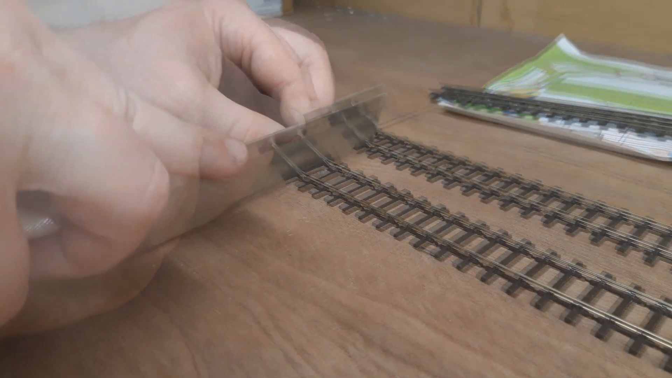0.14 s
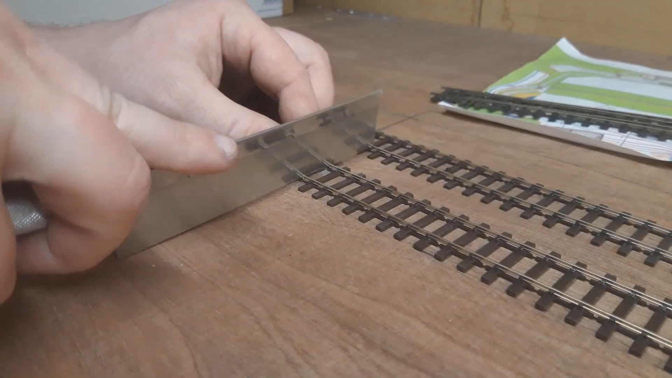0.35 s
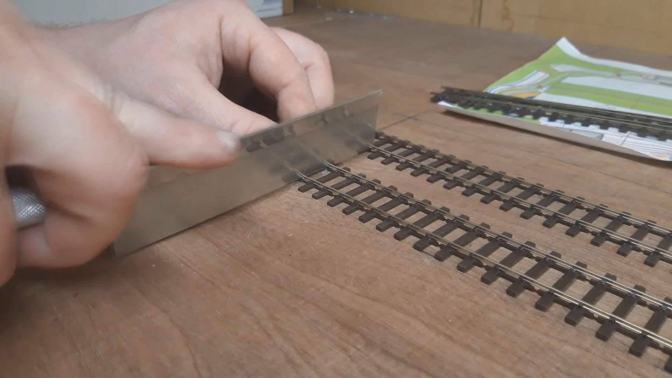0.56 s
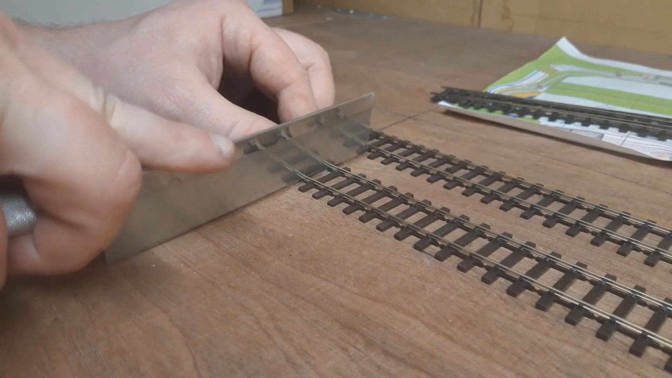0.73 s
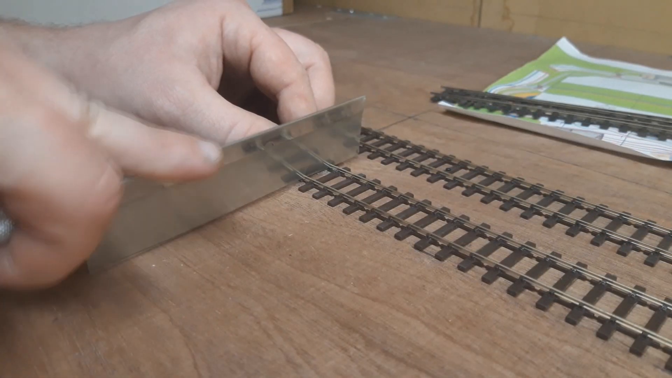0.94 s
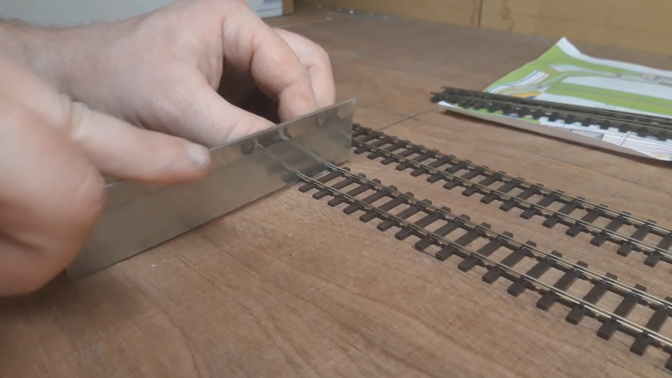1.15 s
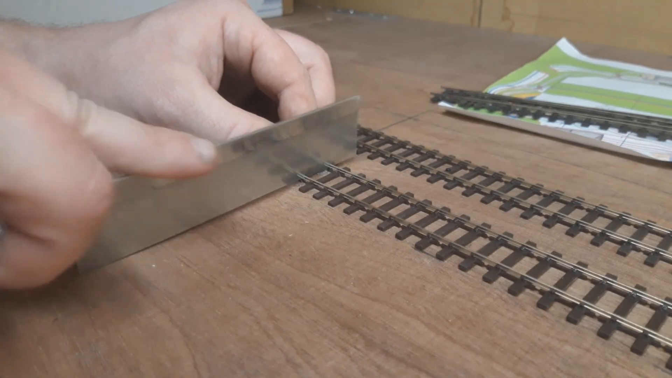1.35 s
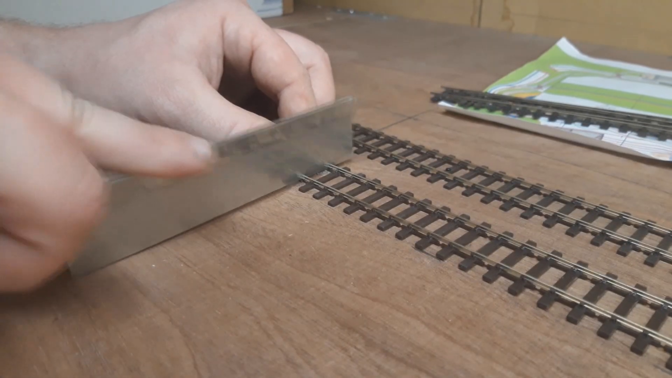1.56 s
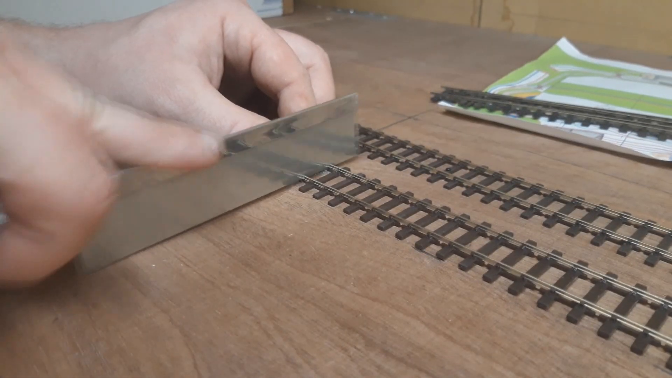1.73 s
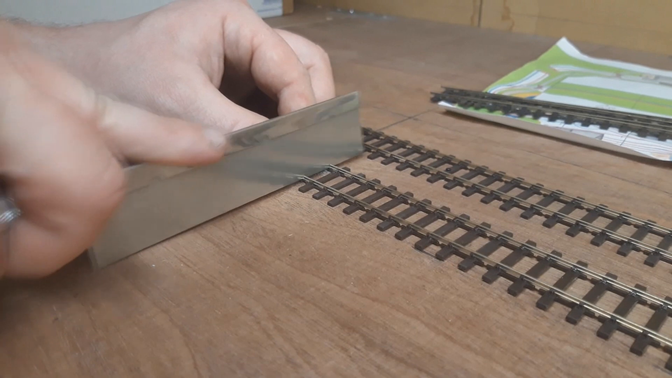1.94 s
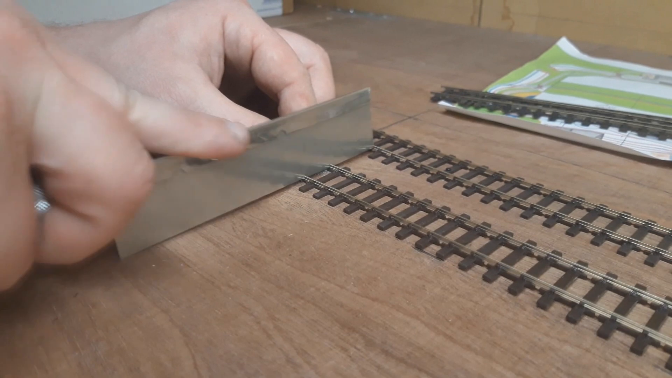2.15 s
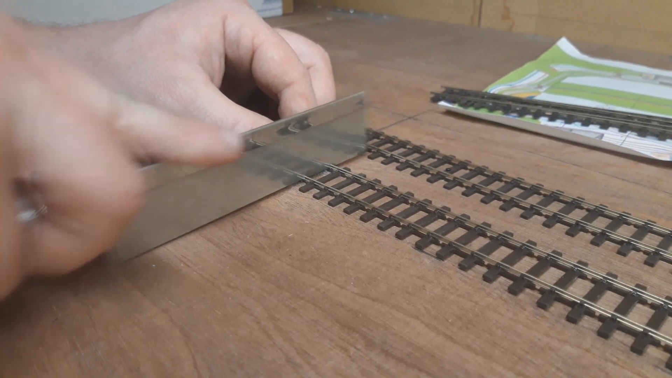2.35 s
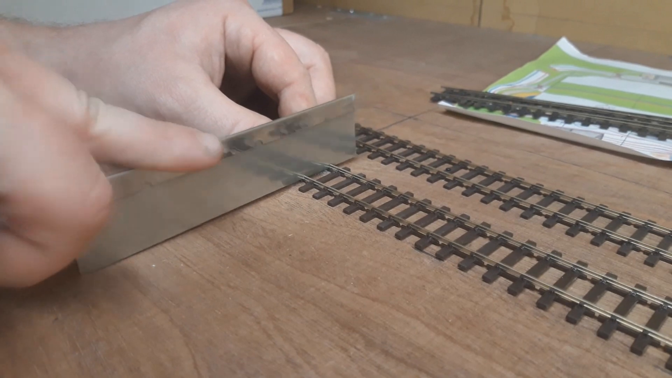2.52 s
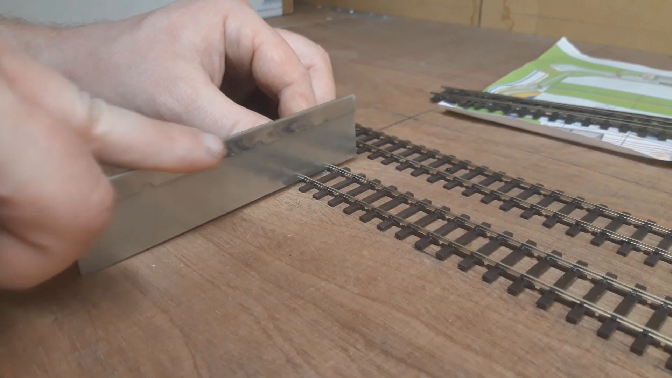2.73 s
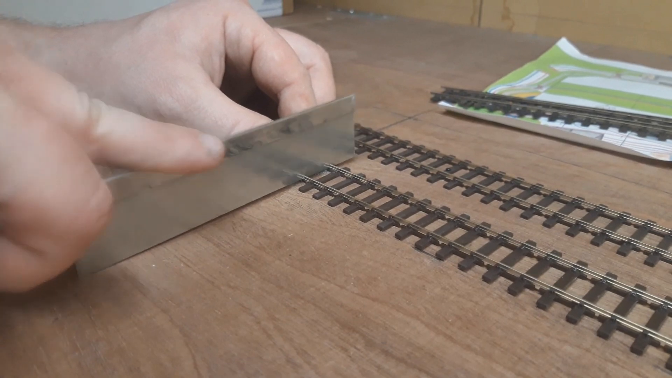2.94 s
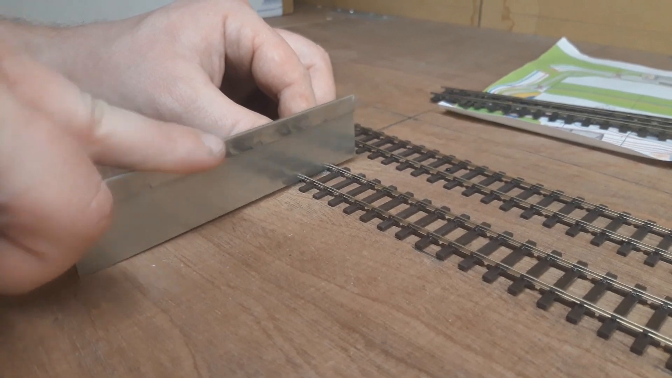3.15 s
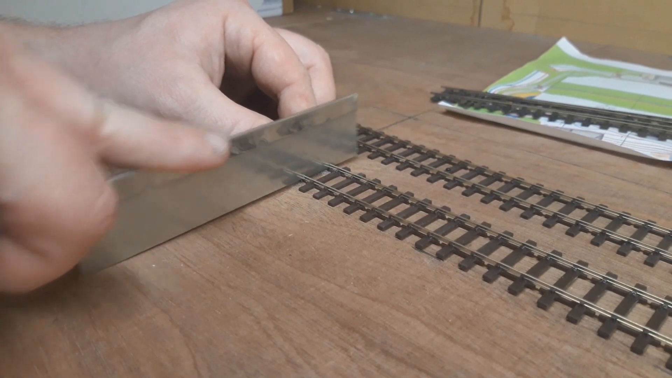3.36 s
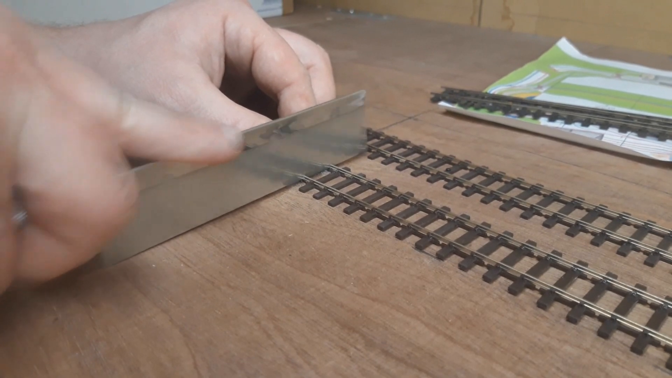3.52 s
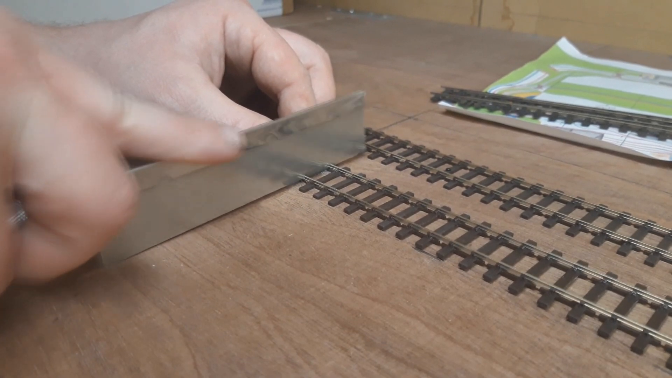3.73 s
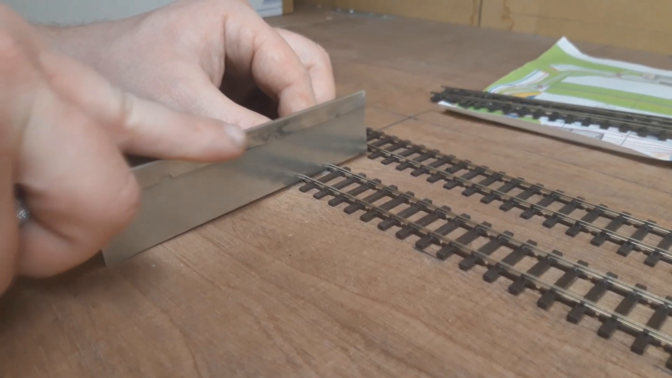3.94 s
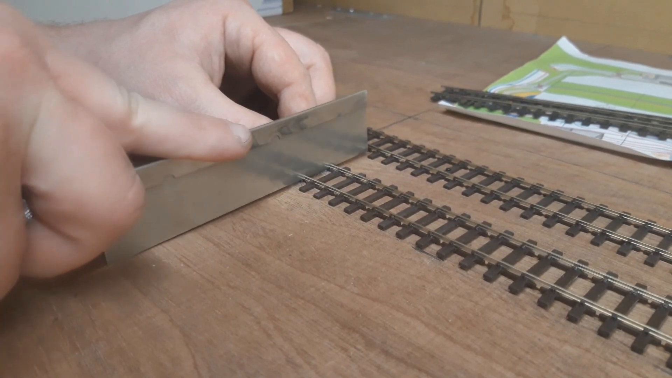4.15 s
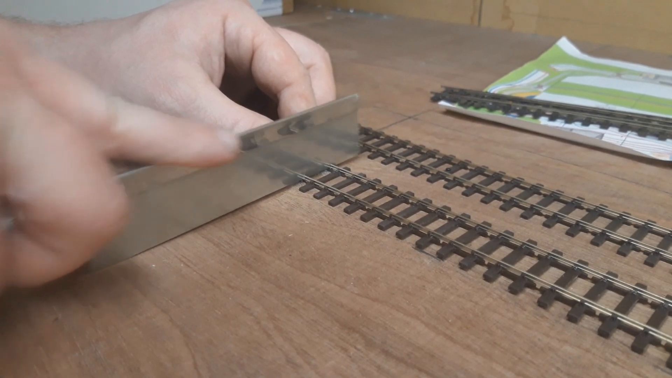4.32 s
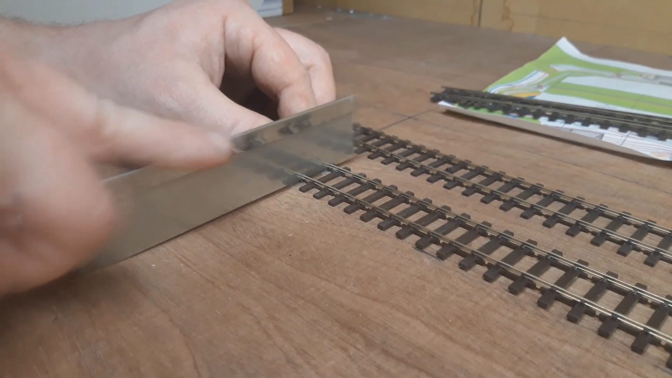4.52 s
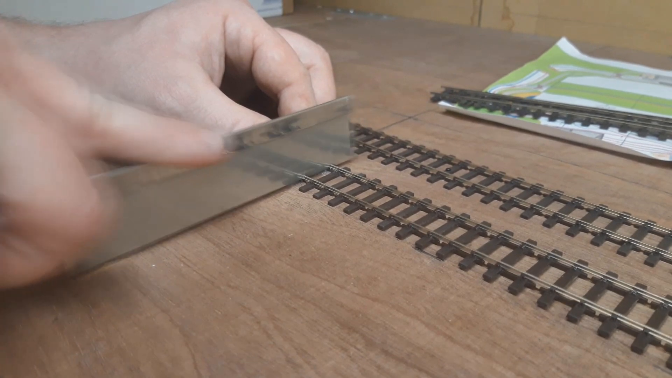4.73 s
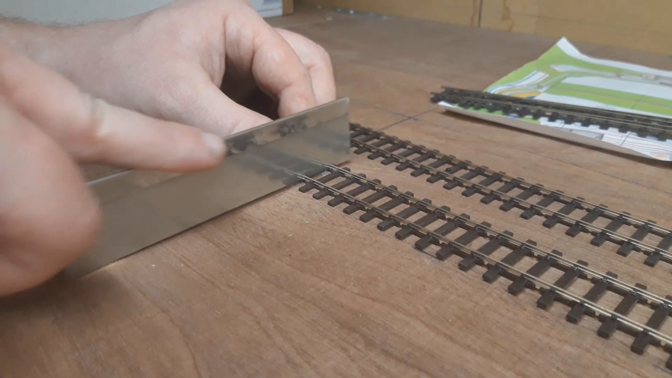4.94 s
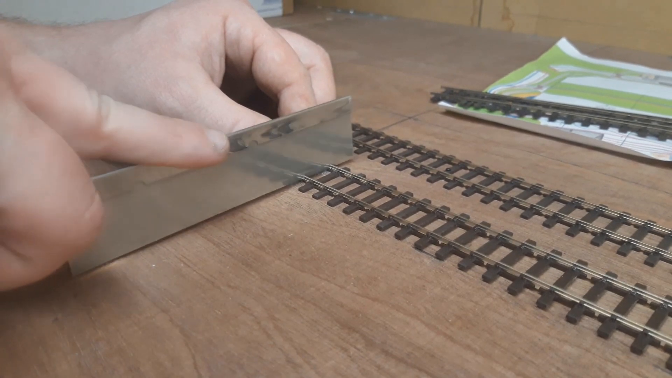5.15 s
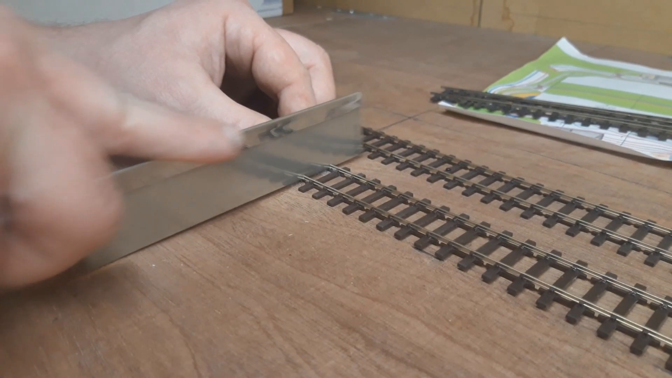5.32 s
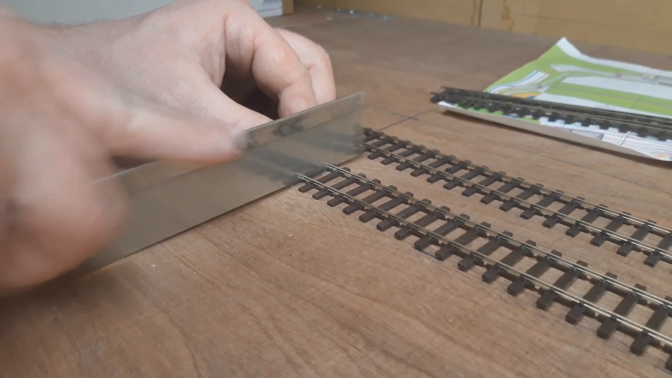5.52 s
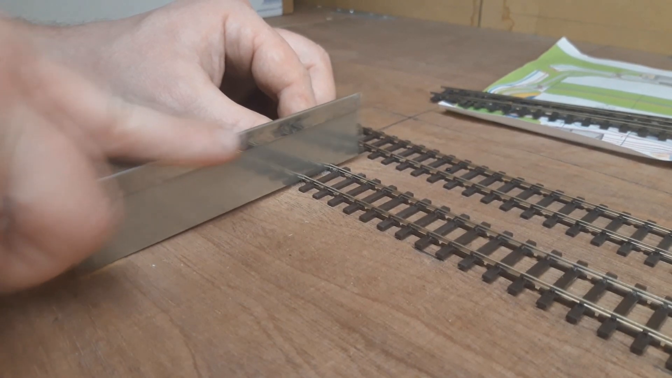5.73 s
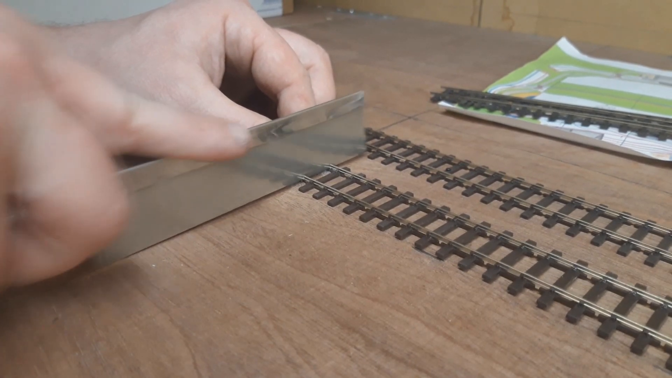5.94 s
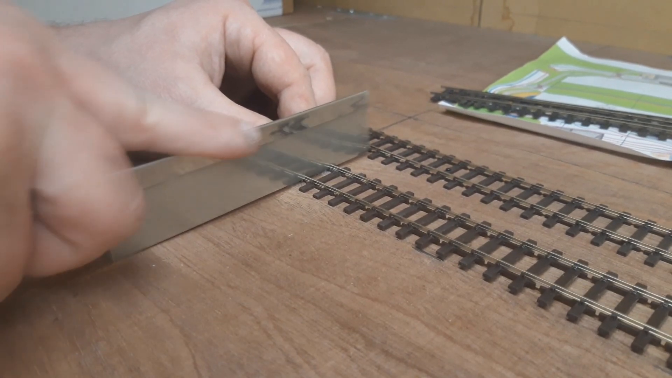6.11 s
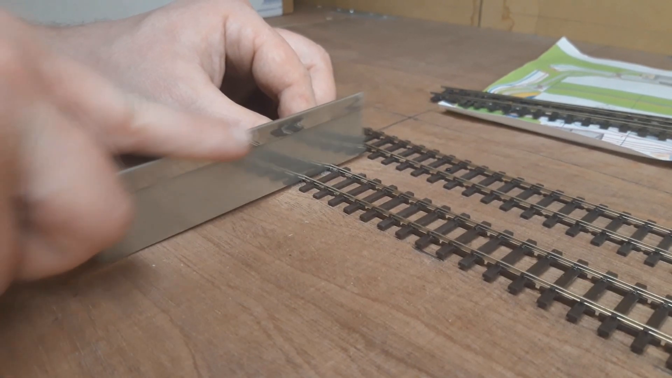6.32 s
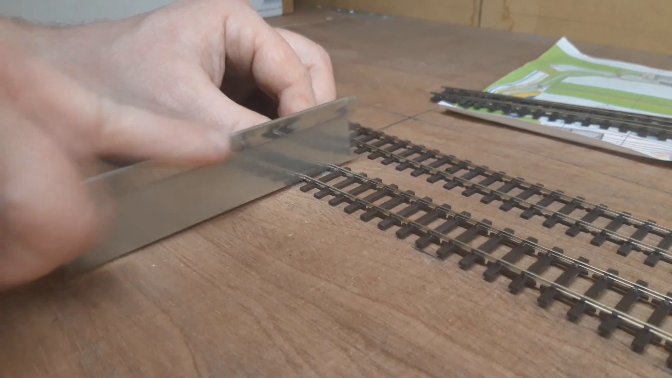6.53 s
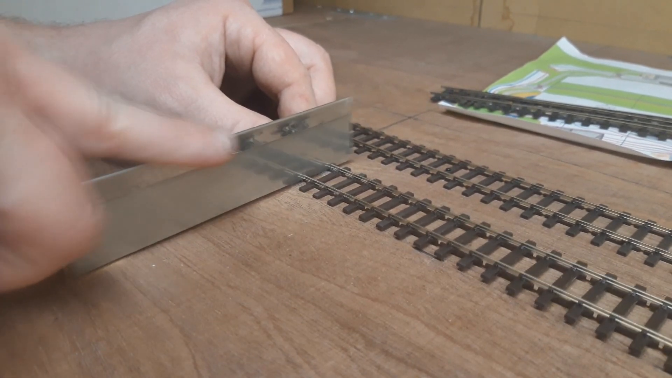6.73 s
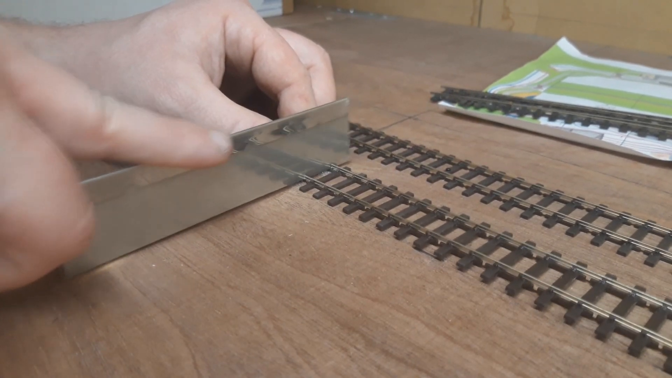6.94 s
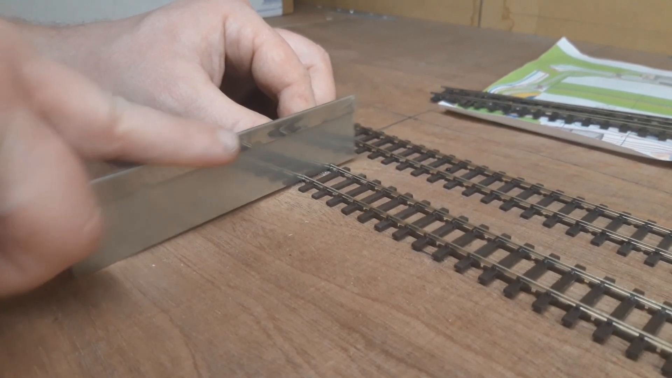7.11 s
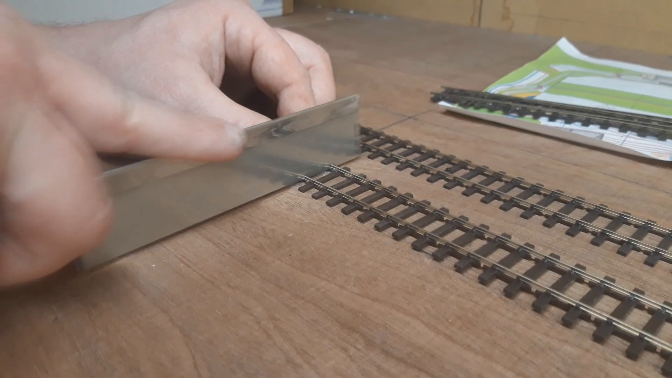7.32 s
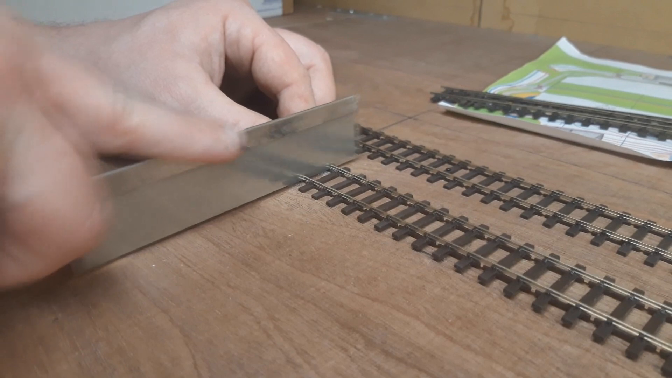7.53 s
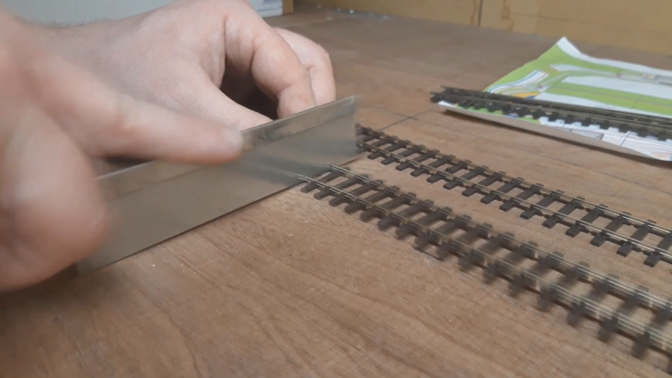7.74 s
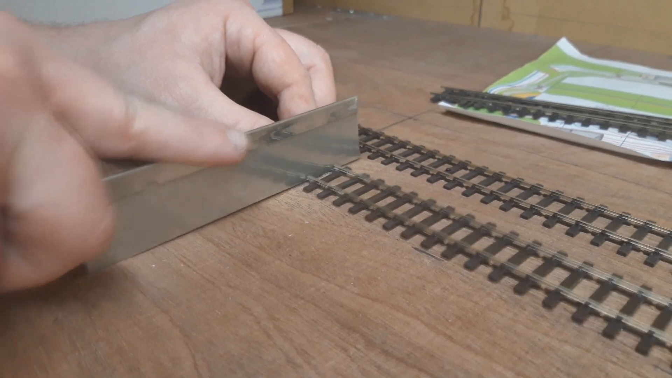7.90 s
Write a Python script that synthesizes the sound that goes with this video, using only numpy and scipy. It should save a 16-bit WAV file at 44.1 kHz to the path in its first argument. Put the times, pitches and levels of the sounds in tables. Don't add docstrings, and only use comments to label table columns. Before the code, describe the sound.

Close, dry metallic back-and-forth rasping of a thin hand saw on a little rail, drumming the wooden board beneath, with sharp ticks and snaps.

```python
import sys
import numpy as np
from scipy import signal
from scipy.fft import rfft, irfft
from scipy.io import wavfile
from scipy.ndimage import uniform_filter1d, map_coordinates

SR = 44100
rng = np.random.default_rng(int(sys.argv[2]) if len(sys.argv) > 2 else 0)


def waveform_to_disk(signal):
    frames = np.transpose(np.atleast_2d(signal))
    scaled = np.clip(frames, -1, 1) * 32767
    samples = np.round(scaled).astype(np.int16)
    wavfile.write(sys.argv[1], SR, samples)


def boost(x):
    u = np.asarray(x, float) / 20
    return 10 ** u


N = 355877

# frequency in Hz, level in dB per Hz.
HUSH_COLOUR = [(15, -36), (25, -6), (134, 1), (285, -14), (384, -12), (1130, -22), (1260, -21.5),
               (1740, -22.5), (9000, -25), (16000, -27)]
# frequency in Hz, t60 in seconds.
ROOM_DECAY = [(100, 0.34), (400, 0.25), (1200, 0.25), (3000, 0.24), (7000, 0.19), (10000, 0.14),
              (14000, 0.15)]
# start in seconds, length in seconds, level in dB,
# resonance in Hz, width in Hz.
FINGER_RUB = (.228, .11, -57, 620, 240)
# frequency in Hz, level in dB per Hz.
THUMP_COLOUR = [(15, -58), (25, -41), (70, -7.5), (113, -14), (173, 3), (276, -3), (300, -9.5), (390, -9),
                (660, -120)]
# frequency in Hz, level in dB per Hz.
BOARD_COLOUR = [(120, -44), (200, -9), (280, -5), (315, 0), (486, 2.5), (529, -0.5), (798, -6), (1490, -17),
                (2500, -18), (3250, -43), (5500, -120)]
# frequency in Hz, width in Hz, height in dB.
BOARD_MODES = [(321.2, 8.6, 13.5), (385, 21, 5.5), (490, 7.7, 4), (560, 34, 4), (636, 16, 11.5),
               (730, 43, 13.5), (825, 40, 14.5), (1033, 20, 11), (1334, 90, 15.5)]
# frequency in Hz, level in dB per Hz.
BLADE_COLOUR = [(600, -42.5), (1000, 1.5), (1500, -11), (2200, -14), (3500, -10.5), (4300, -11.5),
                (5500, -8), (7600, -7.5), (9100, -12.5), (9900, -22), (10500, -24), (13500, -22),
                (15600, -25), (16500, -48)]
# frequency in Hz, width in Hz, height in dB on
# forward strokes, height in dB on return strokes.
STEEL_MODES = [(1822, 155, 16.5, 17), (2383, 47.2, -2, -21), (2724.4, 92, 13.5, 14.5), (3470, 110, 12, 10),
               (3680, 120, 2, 7), (3952.6, 130, 11, 8), (4620, 85, 9.5, 9.5), (5210, 117, 13.5, 8),
               (5700, 130, -2, -3), (6440, 120, -3, -4), (6940, 95, 5, 8.5), (7350, 126, 11, 7),
               (7670, 43, 0, -14), (8040, 68, 11, -6),
               (8500, 250, 4.7, 7), (9400, 360, 6.87, -16), (11300, 510, 9.2, 6), (11600, 390, 16, 12),
              (13000, 97, 2, -2)]
# start in seconds, length in seconds,
# rasp at the grip in dB, rasp at full speed in dB, board over rasp in dB.
DRAGS = [(.0, 0.028, -92.5, -93, 20), (0.108, 0.06, -62, -65.5, 12), (.235, 0.057, -86, -80, 18),
         (0.393, 0.095, -72.5, -78.5, 2), (0.599, 0.034, -56.5, -59, 5.5), (0.633, 0.06, -44, -35.5, 7),
         (0.754, 0.023, -35.5, -48.5, -8), (1.091, 0.028, -56, -52.5, 6), (1.297, 0.026, -45, -46, -1),
         (2.896, 0.019, -47, -46, 3), (3.108, .024, -45.5, -45.5, 1.5), (3.33, 0.041, -46, -46.5, -3),
         (3.548, 0.023, -46, -44.5, 4), (4.421, 0.022, -47, -47.5, -1), (5.089, .03, -46, -43.5, 3),
         (5.305, 0.026, -42.5, -45, -0.5), (5.961, .022, -46.5, -45.5, 3), (1.437, 0.041, -63, -47, -0.5),
         (1.636, 0.015, -47.5, -50, 2), (1.943, .037, -52.5, -44.5, -5), (1.976, 0.034, -56.5, -48.5, 9),
         (2.206, 0.034, -40, -41.5, 5), (2.453, 0.026, -50.5, -47.5, 7), (6.508, 0.032, -31, -39.5, -3.5),
         (7.478, 0.027, -26, -34.5, 3), (7.731, 0.055, -50, -46.5, 2), (7.805, 0.031, -42, -39.5, 6),
         (7.884, 0.034, -34, -34, 0), (8.053, 0.028, -79, -63, 15)]
# start in seconds,
# length in seconds, rasp at the grip in dB, rasp at full speed in dB, board over rasp in dB.
HALTING = [(.861, 0.078, -47.5, -35, 3.5), (.988, 0.025, -37, -31, -8), (1.1095, 0.049, -34.5, -31.5, 6.5),
           (1.229, 0.063, -49.5, -29.5, 4), (1.328, 0.061, -37.5, -45, 6), (1.468, 0.03, -27.5, -31, 3.5),
           (1.526, .075, -34.5, -33.5, 0.5), (1.662, 0.061, -40, -31, 4.5), (1.747, 0.067, -40.5, -33.5, 0),
           (1.863, 0.075, -38, -31, 3), (2.003, 0.055, -39, -39.5, 7.5), (7.4495, 0.031, -30.5, -36.5, 0),
           (7.549, 0.059, -37, -35.5, 0.5), (7.662, 0.054, -38, -33, 2.5), (7.783, 0.026, -33.5, -35.5, -3),
           (7.858, 0.028, -38.5, -39.5, 10), (7.963, 0.065, -45, -45.5, 6)]
# start in seconds, rasp at the grip in dB, rasp at full speed in dB,
# board over rasp in dB, tooth rate in Hz.
PUSHES = [(2.091, -38.5, -28, 1, 383.9), (2.35, -34.5, -28.5, 4, 431.4), (2.59, -34.5, -27, 1, 379),
          (2.807, -36.5, -29.5, 3, 399.8), (3.029, -33.5, -27.5, 4, 420), (3.25, -29.5, -29.5, 2.5, 371.7),
          (3.458, -36.5, -27, 2.5, 425.2), (3.678, -35, -26.5, 4, 429.7), (3.903, -33.5, -27, 2, 413),
          (4.13, -32, -28, 5.5, 420), (4.348, -27.5, -27.5, 1.5, 403.3), (4.554, -30.5, -25, 0, 478.7),
          (4.772, -32.5, -28, 2.5, 471.5), (4.995, -36, -24, 1, 450.3), (5.222, -35, -22, 1, 466),
          (5.437, -35, -23.5, 4, 432.6), (5.661, -31, -26, 3, 501), (5.871, -33.5, -27, 1.5, 387.2),
          (6.091, -33, -23.5, -2, 561), (6.316, -32, -24, 4, 480.8), (6.55, -22, -22.5, -2.5, 479.4),
          (6.772, -42.5, -31.5, 2, 398.5), (6.991, -38, -31, 4, 430), (7.227, -37, -31.5, 1, 397.7)]
PULLS = [(2.234, -34.5, -30, 5, 436), (2.473, -37, -29, 1, 829), (2.696, -40, -30, -0.5, 732),
         (2.916, -38, -29.5, 1.5, 791), (3.129, -38, -31, 1.5, 791), (3.365, -39, -35.5, 5, 330),
         (3.562, -42.5, -31.5, 7, 554), (3.79, -39, -31.5, 2.5, 800), (4.011, -33, -32.5, 3.5, 400),
         (4.234, -33, -29, 4, 764), (4.444, -34, -29, 2, 740), (4.671, -31.5, -27.5, 1.5, 781),
         (4.884, -36, -27, 0.4, 780), (5.121, -36, -28, -2.5, 385), (5.332, -33.5, -25.5, -1.5, 700),
         (5.543, -30.5, -24, 0.5, 571), (5.761, -42, -31, 2.5, 775), (5.982, -37.5, -27.5, -0.2, 764),
         (6.205, -31.5, -25.5, 0, 490), (6.429, -32.5, -27.5, 2.5, 630), (6.672, -26, -32.5, 3, 705),
         (6.885, -34, -36, 2.5, 705), (7.119, -32.5, -36.5, 4, 441), (7.336, -41, -38, 5.5, 619)]
PUSH_CONTACT = [.72, .69, 0.58, .67, .65, .67, 0.65, 0.63, 0.69, 0.56, 0.64, 0.78, .67, 0.69, 0.69, 0.74,
                .65, 0.71, 0.65, 0.65, 0.69, 0.68, 0.76, 0.6]
PULL_CONTACT = [.68, .68, .67, .67, 0.79, .63, 0.65, 0.71, 0.71, 0.54, 0.71, 0.66, .67, 0.89, 0.68, 0.65,
                .67, 0.69, 0.73, 0.69, 0.66, 0.64, 0.71, 0.85]
PUSH_SING = [0, -0.38, 0, -2, 1, 1, 1.17, -0.11, 0.048, 1, 1.2, -0.056, 2, 0, -0.92, -2.03, -0.41, 1.2,
             1.03, 0.86, -1, 1, 0.076, -1]
PULL_SING = [6, 3, -2, 0, 1, -3, -6, -2, -3.5, 0, -5, -0.5, -1, -1.5, -4.5, -1, -1.5, -1, -3, -1.5, -0.5, 0,
             1, -4.5]
# middle in seconds, length in seconds, change of the
# stroke in dB.
JUDDER = [(1.698, 0.005, -9), (2.198, 0.011, 13.5), (2.428, 0.012, 5), (3.1, 0.019, 7.5),
          (3.817, 0.012, -6), (4.169, 0.016, 2), (4.343, 0.01, 12), (4.439, 0.015, -8.5),
          (4.673, 0.025, -5.5), (4.825, 0.021, 5), (5.34, 0.0086, 0), (5.497, 0.0094, -2.5),
          (6.166, 0.024, 8.5), (6.59, 0.0072, 2), (7.049, 0.0079, -13.5), (7.417, 0.043, -17)]
# start in seconds, click peak in dB,
# board knock over the click in dB, ring in Hz.
TAPS = [(0.0993, -30, -1.5, 3470), (0.268, -47.5, -1, 3850), (.403, -50.5, 14, 7900),
        (0.475, -49, -7, 1940), (.599, -33, -11, 3300), (0.6407, -5, 2, 1174), (0.7459, -14, -10.5, 2660),
        (0.764, -23.5, -4.5, 2160), (0.9899, -29, 3, 7260), (1.0915, -49.5, 26.5, 7330),
        (1.4512, -12, -6, 2920), (1.472, -6.5, -5, 4110), (1.527, -25, -13, 7300), (1.655, -9, -8.5, 3190),
        (1.703, -13.5, -3, 5770), (1.957, -18.5, -23.5, 8400), (2.031, -24, 5.5, 6860)]
# start in seconds, click peak in dB, ring in Hz, t60 in ms.
SNAGS = [(4.178, -8, 7198, 8.7), (4.6945, -13, 4200, 14), (5.4724, -10, 7450, 14),
         (6.228, -16, 5220, 14.24), (6.5501, -15, 7503, 6.9), (6.5517, -0.5, 3650, 18),
         (6.563, -7, 4600, 19), (6.5787, -7, 7800, 16), (6.5903, -11, 6360, 16), (6.595, -3.5, 8260, 5.3),
         (6.6012, -2.5, 7700, 5), (6.603, -14.5, 7660, 14), (6.7963, -6.5, 6640, 19),
         (7.2298, -16, 6960, 14.9), (7.3645, -7.5, 6940, 11.6), (7.449, -16, 7300, 15.9),
         (7.482, -19, 7490, 15), (7.669, -6.5, 7530, 13.8), (7.695, -1, 7000, 12),
         (7.697, -2.5, 4470, 14.5), (7.7843, -17, 3760, 21), (7.818, -20, 2670, 13.8),
         (7.8602, -15.5, 2706, 12.3), (7.8722, -21, 8150, 11.3), (7.8931, -13.5, 7350, 8.3)]
# start in seconds, peak in dB, ring in Hz.
CHIPS = [(1.673, -15, 3416), (1.9258, -18, 7075), (2.0228, -26.5, 7050), (2.1539, -15, 7800),
         (2.2205, -23.5, 3490), (2.2423, -26, 6890), (2.4427, -14.5, 3440), (2.8362, -13.5, 6940),
         (3.0607, -10.5, 8110), (3.1728, -11, 7390), (3.6035, -14, 6990), (3.951, -9.5, 7534),
         (4.1517, -11.5, 7256), (5.1534, -16, 3935), (5.4936, -13, 5760), (5.777, -16.5, 7270),
         (5.9165, -12, 6740), (6.098, -15, 7537), (6.3698, -20, 7670), (6.463, -6.5, 4678),
         (6.5128, -7.5, 3680), (7.0188, -11.5, 7040), (7.03, -9, 7340), (7.1373, -10.5, 3924),
         (7.246, -11.5, 8120), (7.266, -11.5, 7630)]
# start in seconds, peak in dB.
TICKS = [(0.9893, -25), (0.9981, -29), (1.004, -32), (1.1108, -24), (1.1398, -21), (1.3677, -29),
         (1.455, -21), (1.4702, -5), (1.4743, -5), (1.5457, -13.5), (1.5845, -17), (1.675, -13),
         (1.7065, -15), (1.748, -27.5), (1.9101, -12.5), (1.955, -34), (1.9591, -25.5), (2.0092, -23),
         (2.031, -10), (2.0986, -14.5), (2.1541, -0.5), (2.2165, -28), (2.253, -13), (2.289, -14),
         (2.4446, -27), (2.472, -22), (2.4797, -17), (2.6539, -17), (2.8326, -9), (2.8748, -16.5),
         (2.958, -10.5), (2.9845, -22), (3.0482, -5.5), (3.1886, -16), (3.2693, -9), (3.306, -14),
         (3.7113, -9.5), (3.7485, -20),
         (3.907, -12), (4.1782, -7), (4.2877, -18.5), (4.56, -9.5), (4.8063, -0.5), (4.9206, -9),
              (5.1269, -13.5), (5.1582, -7), (5.2319, -16), (5.2541, -2.5), (5.2945, -4), (5.5042, -6),
              (5.6668, -2.5), (6.4348, -20), (6.5131, -17), (6.5616, -4), (6.575, -11), (6.6741, -14),
              (6.6863, -9.5), (6.7911, -9), (6.7974, -10), (6.9927, -16), (7.0126, -19), (7.0308, -13.5),
              (7.1385, -9.5), (7.2328, -10), (7.2367, -19), (7.246, -12), (7.2661, -15), (7.3382, -26),
              (7.6632, -32), (7.6983, -16), (7.7852, -7), (7.8113, -17), (7.8178, -17), (7.8605, -21),
              (7.8718, -22)]
# start in seconds, level in dB.
KNOCKS = [(1.111, -19), (1.47, -16), (1.51, -29), (1.678, -15), (2.026, -28), (2.113, -19.5),
          (3.085, -24.5), (3.275, -21), (3.948, -21), (4.139, -16), (4.691, -22), (4.8, -28), (4.855, -31),
          (5.032, -20.5), (5.077, -24), (5.514, -28), (5.572, -16), (5.92, -19.5), (6.16, -21.5),
          (6.361, -14.5), (6.629, -21), (6.817, -20), (7.134, -16)]
# start in seconds, peak in dB.
SNAPS = [(.6354, -38), (0.639, -15), (0.7457, -21), (1.4511, -26), (1.654, -27), (6.55, 1), (6.5537, -7),
         (6.6003, 0.5), (7.2295, -30.5), (7.3643, -12.5), (7.451, -28), (7.4797, -28.5), (7.669, -20),
         (7.695, -1), (7.8938, -24)]


def unit(x):
    return x / np.sqrt(np.mean(x ** 2) + 1e-20)


def along(points, hz):
    f, v = np.transpose(points)
    return np.interp(np.log(hz + 1), np.log(f + 1), v)


def wobble(rate):
    knots = rng.standard_normal(int(N * rate / SR) + 4)
    return map_coordinates(knots, [np.arange(N) * rate / SR])


def put(track, start_s, burst):
    at = round(start_s * SR)
    track[at:at + len(burst)] += burst


def body(x, colour, modes, ring):
    size = 2 ** 13
    f = np.fft.rfftfreq(size, 1 / SR)
    peaks = sum(boost(db) * f * w / np.abs(c * c - f * f + 1j * f * w) for c, w, db in modes)
    cepstrum = irfft(np.log(boost(along(colour, f)) * (1 + ring * peaks) + 1e-6))
    cepstrum[1:size // 2] *= 2
    cepstrum[size // 2 + 1:] = 0
    response = irfft(np.exp(rfft(cepstrum)))[:size // 2]
    return signal.fftconvolve(x, response / np.linalg.norm(response))[:N]


def hush():
    return boost(-73) * body(rng.standard_normal(N), HUSH_COLOUR, [(75, 30, 0)], ring=0.3)


def room(x):
    out, step, delay = np.zeros(N + SR), SR // 4, 130
    for at in range(0, N, step):
        hz, t, z = signal.stft(rng.standard_normal(SR // 2), SR, nperseg=256)
        decay = boost(-60 * t / along(ROOM_DECAY, hz)[:, None])
        tail = signal.istft(z * decay, SR, nperseg=256)[1]
        wet = signal.fftconvolve(x[at:at + step], tail / np.linalg.norm(tail))
        out[at + delay:at + delay + len(wet)] += wet
    return out[:N]


def finger():
    start_s, length_s, db, hz, width_hz = FINGER_RUB
    u = np.clip((np.arange(N) / SR - start_s) / length_s, 0, 1)
    hollow = signal.iirpeak(hz, hz / width_hz, SR)
    tone = signal.lfilter(*hollow, rng.standard_normal(N))
    tone = signal.lfilter(*hollow, tone)
    return boost(db + 2.5 * wobble(40)) * np.abs(np.sin(np.pi * u)) ** 0.7 * unit(tone)


def strokes():
    back_hz, forth_hz, drag_hz = 751.6, 420, 481
    lean_forth_db, lean_drag_db = 8, -6.5
    rows = [(*row, drag_hz, lean_drag_db, -3) for row in DRAGS]
    for k, row in enumerate(HALTING):
        rows.append((*row, forth_hz, lean_forth_db, -1.5) if k % 2 else (*row, back_hz, 0, -1.5))
    steady = [(*row, lean_forth_db) for row in PUSHES] + [(*row, 0) for row in PULLS]
    turns = [row[0] for row in [*steady, *HALTING]]
    contact, sings = [*PUSH_CONTACT, *PULL_CONTACT], [*PUSH_SING, *PULL_SING]
    for (start_s, *rest), share, sing_db in zip(steady, contact, sings):
        next_turn = min(turn for turn in turns if turn > start_s)
        rows.append((start_s, share * (next_turn - start_s), *rest, sing_db))
    return rows


def hand():
    rasp, drum, rate, weight, sing = np.zeros((5, N))
    t = np.arange(N) / SR
    for s, length, grip_db, peak_db, board_db, hz, lean_db, sing_db in strokes():
        span = slice(max(round(s * SR), 0), round((s + 1.3 * length) * SR))
        u = np.maximum((t[span] - s) / length, 0)
        middle = np.clip(0.42 + 0.008 * (peak_db - grip_db), 0.2, 0.7)
        rising = np.clip(1 - u / middle, 0, 1)
        slowing = np.maximum((u - middle) / (1 - middle), 0)
        grip = 1 - np.exp(-u * length / 0.0026)
        level = grip * boost(peak_db + (grip_db - peak_db) * rising ** 1.36)
        rasp[span] += level * boost(-17 * slowing ** 3.18)
        drum[span] += level * boost(board_db - 10.15 * slowing ** 2 - 2 * rising)
        weight[span] = drum[span] * boost(lean_db)
        rate[span] = hz * (1.02 - 0.15 * rising ** 2 - 0.12 * slowing ** 2)
        sing[span] = boost(sing_db)
    judder = boost(sum(db * np.exp(-(1.67 * (t - s) / length) ** 2) for s, length, db in JUDDER))
    return rasp * judder, drum * judder ** 0.56, rate, weight * judder ** 0.6, sing


def rocking():
    usual_db, thump_db = -28, -11.5
    lag_s, growth = 0.0066, 0.45
    keep = np.exp(-1 / (lag_s * SR))
    weight = signal.lfilter([1 - keep], [1, -keep], hand()[3]) / boost(usual_db)
    thump = body(rng.standard_normal(N), THUMP_COLOUR, [(76, 14, 0.016), (155, 12, 0.025)], ring=0.65)
    return boost(usual_db + thump_db) * np.abs(weight) ** growth * thump


def snaps():
    air, t, t60_s = np.zeros(N + SR), np.arange(SR // 50) / SR, 0.0013
    for s, db in SNAPS:
        put(air, s, boost(db - 7 - 60 * t / t60_s) * rng.standard_normal(len(t)))
        put(air, s, boost(db) * np.array([2, 1, -1]))
    return signal.lfilter(*signal.butter(2, [1300, 9500], "band", fs=SR), air[:N])


def knocks():
    wood, t, t60_s = np.zeros(N + SR), np.arange(SR // 10) / SR, 0.051
    onset = 1 - np.exp(-t / 0.0027)
    for s, db in KNOCKS:
        put(wood, s, boost(db + 1.5 - 60 * t / t60_s) * onset * rng.standard_normal(len(t)))
    return wood[:N]


def ticks():
    steel, t, t60_s = np.zeros(N + SR), np.arange(SR // 10) / SR, 0.0048
    for s, db in TICKS:
        grit = np.diff(rng.standard_normal(len(t)), n=2, prepend=[0, 0])
        put(steel, s, boost(db - 7.5) * np.array([0.85, -1.2, 0.4]))
        put(steel, s, boost(db - 13.5 - 60 * t / t60_s) * grit)
    return steel[:N]


def snags():
    steel, wood, t = np.zeros(N + SR), np.zeros(N + SR), np.arange(SR // 10) / SR
    tap_edge, snag_edge = (-0.82, 0.8, 0.35), (0.034, 0.91, 0.37)
    hits = [(*row, 0.021, tap_edge) for row in TAPS]
    hits += [(s, db, -20, hz, ms / 1000, snag_edge) for s, db, hz, ms in SNAGS]
    hits += [(s, db + 3, -18.5, hz, 0.012, snag_edge) for s, db, hz in CHIPS]
    for s, db, knock_db, hz, t60_s, (edge, share, smear) in hits:
        grit, thud, drift = rng.standard_normal((3, len(t)))
        ring = np.sin(2 * np.pi * hz * t + smear * np.cumsum(drift))
        ring *= 0.84 * boost(-60 * t / (1.67 * t60_s))
        crack = share * boost(-60 * t / t60_s) * (grit - edge * np.roll(grit, shift=1))
        put(steel, s, boost(db - 15) * (crack + ring))
        decay = boost(db + knock_db - 6.5 - 60 * t / (3.2 * t60_s))
        put(wood, s, decay * (1 - np.exp(-t / 0.00062)) * thud)
    for s, db, *_ in SNAGS:
        put(steel, s, boost(1.7 * db + 3) * np.array([1, -0.9]))
    free = np.sin(2 * np.pi * 3480 * t + 0.1 * np.cumsum(rng.standard_normal(len(t))))
    put(steel, TAPS[0][0], boost(-53 - 60 * t / 0.12) * free)
    return steel[:N] + ticks(), wood[:N]


def teeth(rate, jitter, spread_db):
    passed = np.floor(np.cumsum(rate * np.exp(jitter * wobble(300))) / SR)
    size = boost(spread_db * rng.standard_normal(N))
    pulses = (np.diff(passed, prepend=0) > 0) * size
    return pulses / np.sqrt(np.sum(pulses ** 2) / np.sum(rate > 0))


def patches(depth_db):
    z = signal.stft(rng.standard_normal(N), nperseg=256)[2]
    field = uniform_filter1d(rng.standard_normal(z.shape), size=4, axis=0)
    field = uniform_filter1d(field, size=9, axis=1)
    return unit(signal.istft(z * boost(depth_db * unit(field)), nperseg=256)[1][:N])


def blade(x, forth):
    hz, width, *levels = np.transpose(STEEL_MODES)
    place = np.clip(1 + 1.1 * wobble(9), 0, 2)
    out = np.zeros(N)
    for way, db, ring in zip([forth, ~forth], levels, [0.6, 0.41]):
        for spot in range(3):
            shift, change = rng.standard_normal((2, len(hz)))
            near = np.sqrt(np.clip(1 - np.abs(place - spot), 0, 1))
            modes = zip(hz * (1 + 0.026 * shift), width, db + 2.5 * change)
            out += body(x * way * near, BLADE_COLOUR, modes, ring)
    return out


def saw():
    rasp, drum, rate, weight, sing = hand()
    forth = weight > drum
    bite = teeth(rate, jitter=0.12, spread_db=3)
    chips = signal.lfilter([1], [1, -0.93], bite)
    unsteady = boost(1.3 * wobble(120) + 1.2 * wobble(400))
    tearing = unit(patches(depth_db=2.5) * (1 + 0.16 * chips) * unsteady)

    phase = 2 * np.pi * np.cumsum(rate * (1 + 0.0598 * wobble(120))) / SR
    hum = np.sin(phase) * (0.37 + 0.39 * wobble(50))
    surge = np.clip(rasp / (uniform_filter1d(rasp, size=4000) + 1e-9), 0, 2)
    hum *= sing * np.sqrt(rate / 500) * surge ** 0.089
    shudder = unit(0.44 * bite + 0.28 * hum + patches(depth_db=2)) * boost(0.83 * wobble(60))

    click, knock = snags()
    board = body(drum * shudder + knock + knocks(), BOARD_COLOUR, BOARD_MODES, ring=0.55)
    push = np.abs(knock) ** 0.5 + 14 * knock
    jolt = boost(-31) * body(push, THUMP_COLOUR, [(75, 9.9, 0.02)], ring=0.58)
    before = round(0.59 * SR)
    board[:before] = boost(-1.5) * signal.lfilter(*signal.butter(1, 1800, fs=SR), board[:before])
    steel = blade(rasp * tearing + click, forth)
    return boost(-0.98) * steel + boost(0.21) * board + jolt + snaps()


def scene():
    cut = saw()
    return (cut + boost(-11.5) * room(cut) + rocking() + finger() + hush())[None]


def roll_off(x):
    return signal.sosfilt(signal.butter(12, 16830, fs=SR, output="sos"), x)


def record(dry):
    rounded = dry / (1 + np.abs(dry / 0.95) ** 6) ** (1 / 6)
    hz = np.fft.rfftfreq(N, 1 / SR)
    shelf = boost(np.interp(hz, [15600, 15900], [0, -22])) * (hz < 16800)
    mix = irfft(rfft(rounded) * shelf, N)
    return roll_off(mix)


dry = scene()
out = record(dry)
waveform_to_disk(out)
```